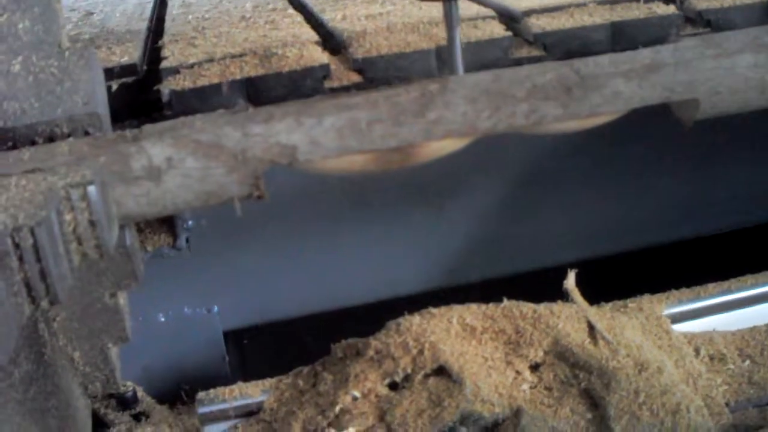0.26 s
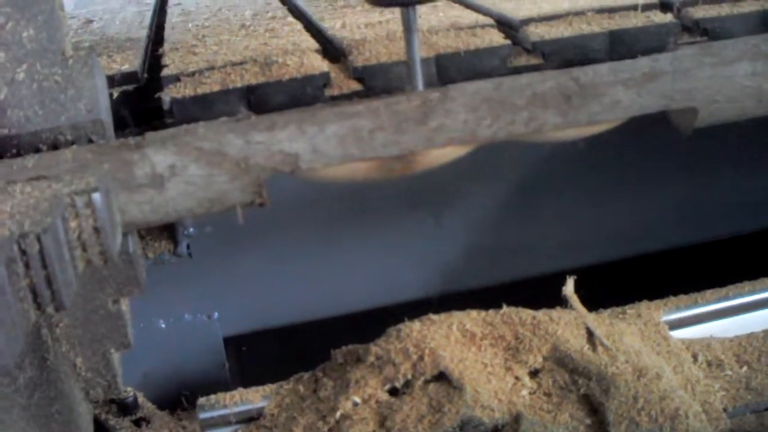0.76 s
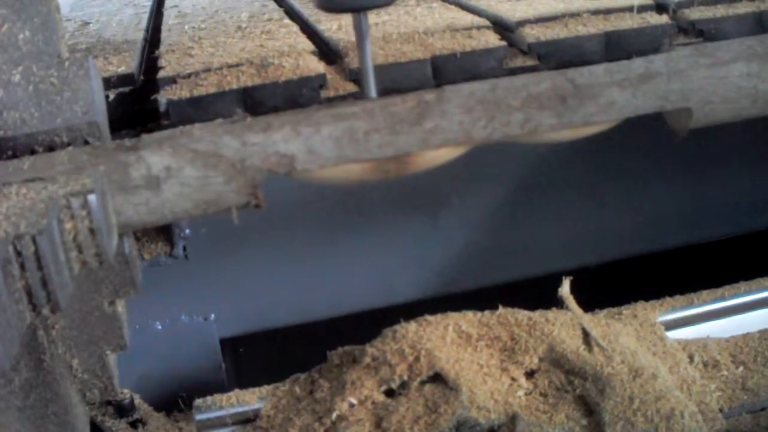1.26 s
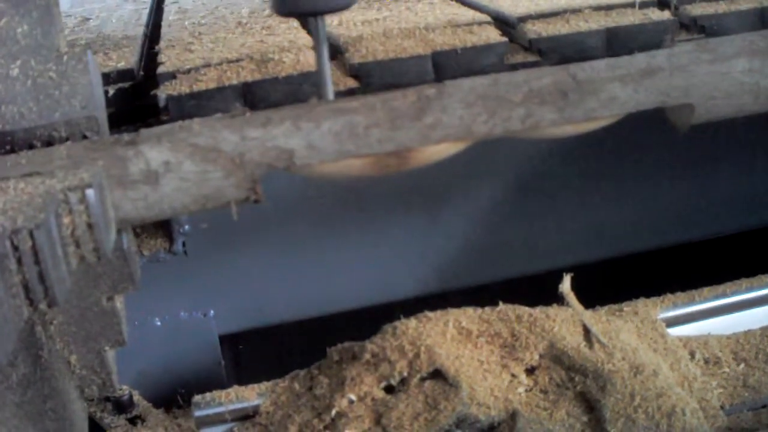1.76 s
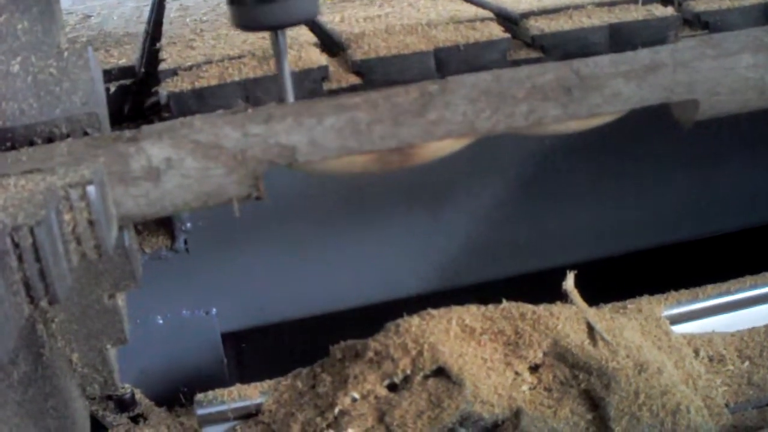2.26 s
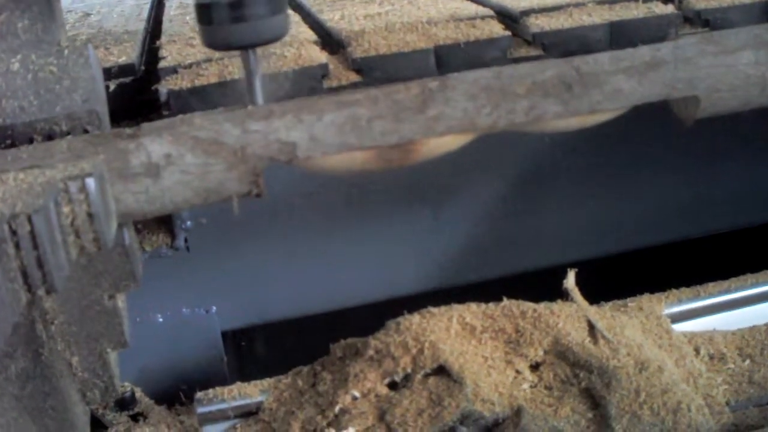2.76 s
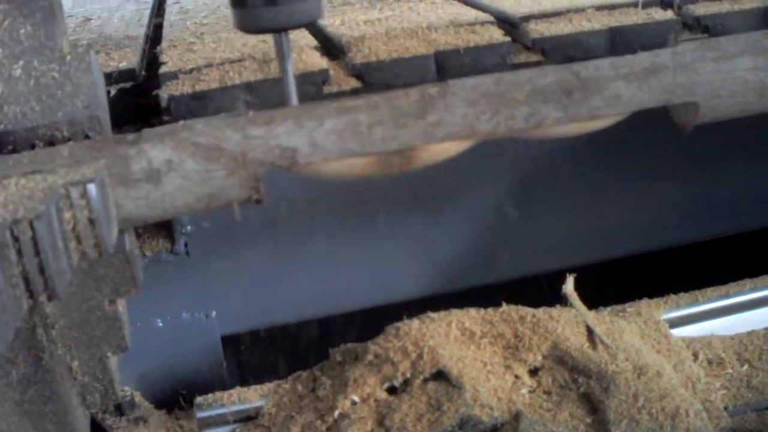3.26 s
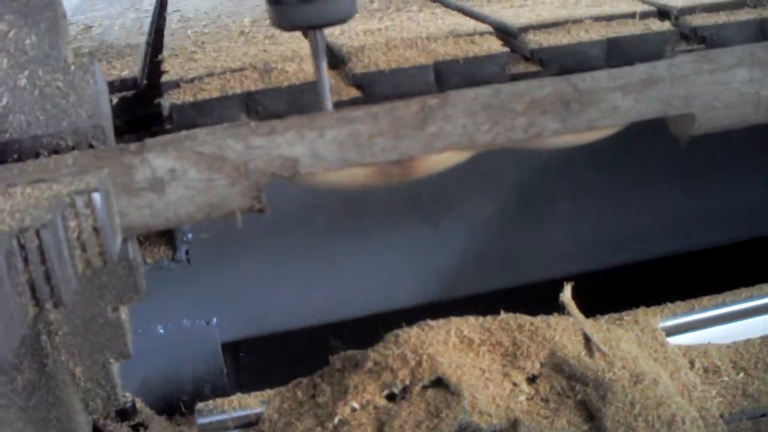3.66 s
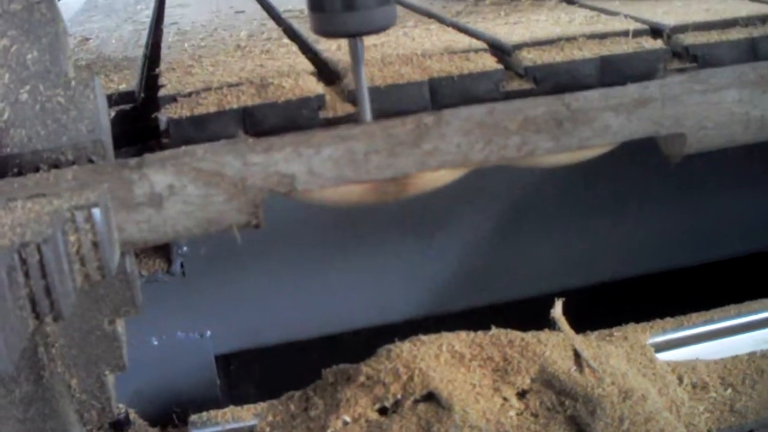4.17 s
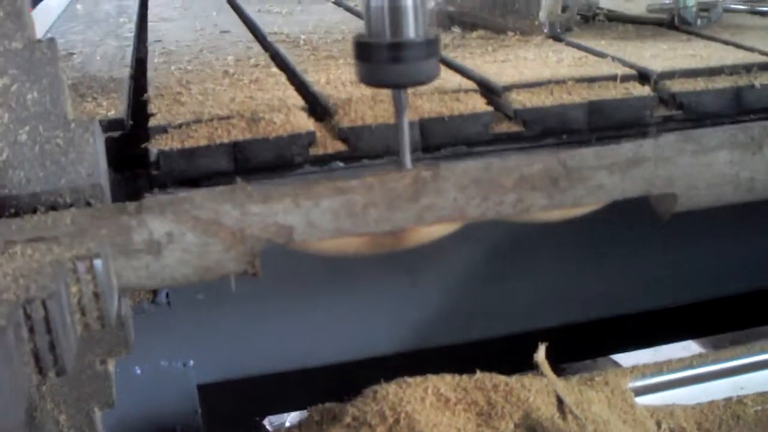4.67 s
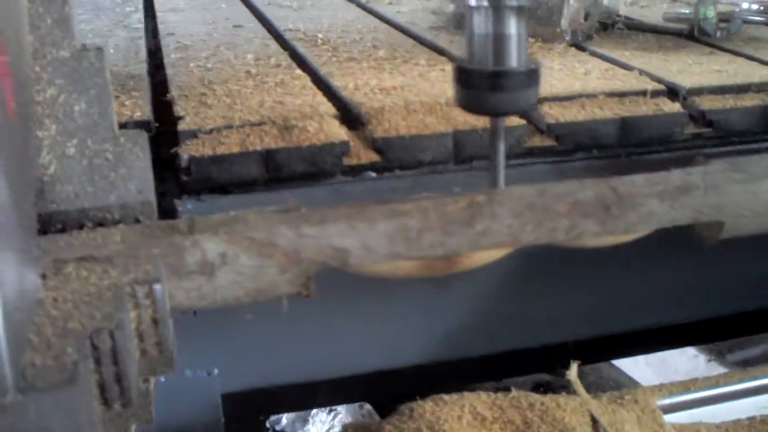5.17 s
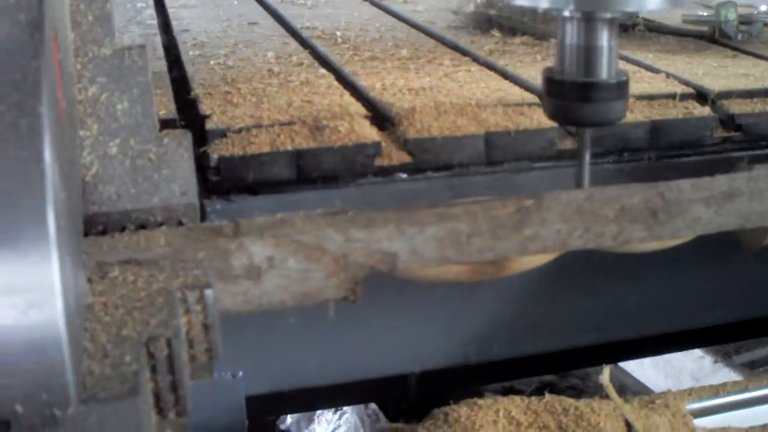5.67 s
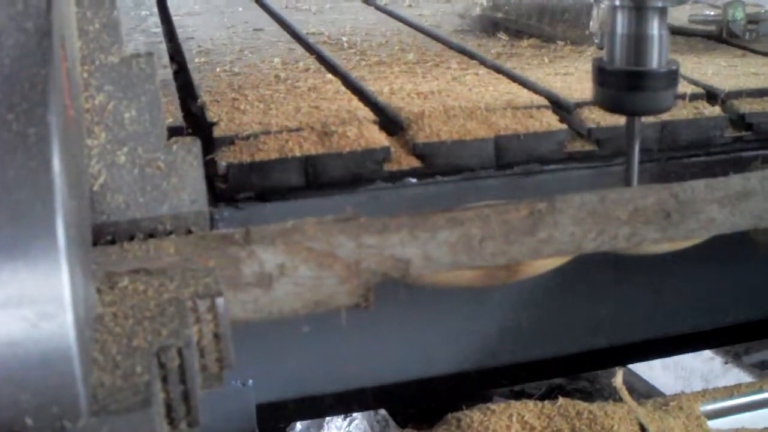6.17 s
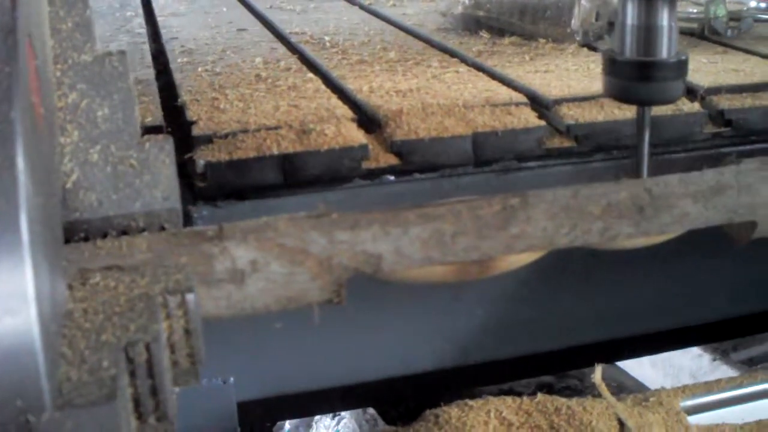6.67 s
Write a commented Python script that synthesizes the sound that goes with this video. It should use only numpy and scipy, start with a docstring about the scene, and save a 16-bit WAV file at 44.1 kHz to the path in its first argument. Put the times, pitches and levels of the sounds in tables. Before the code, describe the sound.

Close-up wood milling: buzzing high whine, gritty cutting hiss, piercing metallic squeals, a brief rough screech and a soft low rush.

```python
"""In a workshop, close to the microphone, a CNC router carves a wooden board.
The spindle whines at orders of 300 turns a second, and its two flutes rasp as noise pulsed twice a turn.
The slender bit rings in its bending modes, chatters near 4 kHz and once breaks into a screech.
A drive whistles thinly, axis motors hum louder in moves, a few dry ticks are decaying noise,
and a soft rush of low noise swells and fades."""
import sys
import numpy as np
from scipy import signal
from scipy.fft import rfft, irfft, next_fast_len
from scipy.io import wavfile
from scipy.ndimage import uniform_filter1d, minimum_filter1d

SR = 44100
rng = np.random.default_rng(int(sys.argv[2]) if len(sys.argv) > 2 else 0)


def wav_record(signal):
    """Record a signal, one row per channel, as 16-bit PCM in the file named by sys.argv[1]."""
    frames = np.transpose(np.atleast_2d(signal))
    bounded = np.clip(frames, -1, 1)
    # unit amplitude maps onto the largest positive 16-bit level
    quanta = np.round(bounded * 32767).astype(np.int16)
    wavfile.write(sys.argv[1], SR, quanta)


N = 305172
T = np.arange(N) / SR  # time in seconds


def amp(db):
    """Logarithmic level: converts decibels to an amplitude gain."""
    return 10 ** (np.asarray(db) / 20)


def unit(x):
    """Normalisation: scales a signal to an rms of 1."""
    return x / np.sqrt(np.mean(abs(x) ** 2) + 1e-20)


def curves(rows):
    """Linear interpolation: the columns of a timed table at every sample."""
    s, *columns = np.transpose(rows)
    return [np.interp(T, s, column) for column in columns]


def during(rows):
    """Gating: 1 while a timed table lasts, with soft edges."""
    since_start, until_end = T - rows[0][0], rows[-1][0] - T
    return np.clip(np.minimum(since_start, until_end) / 0.0035 + 1, 0, 1)


def bump(s, half_length_s):
    """Gaussian envelope: a smooth rise and fall around s."""
    return np.exp(-np.square((T - s) / half_length_s))


def swell(s, attack_s, release_s):
    """Attack and exponential relaxation: rises to 1 at s, then dies away."""
    return np.where(T < s, bump(s, attack_s), np.exp(-abs(T - s) / release_s))


def plateau(s, half_length_s):
    """Flat-topped envelope: rises quickly to 1, holds around s and falls again."""
    return 1 / (1 + ((T - s) / half_length_s) ** 8)


def wander(rate_hz):
    """Low-passed random motion: noise that weakens above rate_hz, at rms 1."""
    size = next_fast_len(N)
    hz = np.fft.rfftfreq(size, 1 / SR)
    spectrum = rfft(rng.standard_normal(size)) / (1 + (hz / rate_hz) ** 2)
    return unit(irfft(spectrum, size)[:N])


def coloured(x, points):
    """Linear filtering: weights the spectrum of x by (Hz, dB) points, at rms 1."""
    hz, db = np.transpose(points)
    log_hz = np.log(np.fft.rfftfreq(N, 1 / SR) + 1)
    gain = amp(np.interp(log_hz, np.log(hz), db))
    return unit(irfft(rfft(x) * gain, N))


def resonate(x, hz, width_hz):
    """Resonance: one damped mode, with gain 1 at its centre."""
    b, a = signal.iirpeak(hz, hz / width_hz, SR)
    return signal.lfilter(b, a, x)


# The shaft sags very slightly under load. Each row: time in seconds, mean speed in turns a second.
SHAFT_SPEED = [(0, 299.85), (.9, 299.75), (2.2, 299.85), (3.3, 299.9), (4.3, 299.7), (4.73, 299.45),
               (5.2, 299.55), (6, 299.9), (6.92, 299.8)]


def spindle_angle(flutter=0.00026):
    """Integration of speed: the angle of the shaft in radians, turning almost steadily."""
    turns_per_s = curves(SHAFT_SPEED)[0] * (1 + flutter * wander(38))
    return 2 * np.pi * np.cumsum(turns_per_s) / SR


# Depth of the cut, which rasp, hiss, rumble and the idle ring of the bit follow.
# Each row: time in seconds, relative level in dB.
CUT_DEPTH = [(0, 0.5), (.35, -2), (1.0, 0.5), (1.7, 0), (2.15, 3), (2.5, -1.5), (3.0, -1), (3.8, -3.5),
             (4.25, -7), (4.9, -4), (5.25, -2.5), (5.85, -2), (6.25, -3), (6.55, -3), (6.92, -1)]


def bite(dip_db, tear_db):
    """Additive decibels: depth, brief dips and tough grain together set the level of the cutting."""
    return curves(CUT_DEPTH)[0] + dip_db + tear_db


# Brief dips in the level of the cutting and whine, one under the rush of air.
# Each row: time of the lowest level in seconds, recovery time constant in seconds, change in dB.
LEVEL_DIPS = [(.266, .012, -7.5), (.335, 0.018, -5.5), (.776, .006, -5), (1.7, 0.034, -2.5),
              (2.254, 0.0091, -7), (2.699, 0.019, -14), (2.776, 0.085, -11), (3.958, 0.16, -8.5),
              (5.27, 0.02, -2.5), (6.22, 0.12, -2)]
DIP_ATTACK_S = .008


def dipping():
    """Exponential recovery: decibels lost in brief dips, which fall quickly and return gradually."""
    return sum(db * swell(s, DIP_ATTACK_S, recovery) for s, recovery, db in LEVEL_DIPS)


# Tough patches of grain that tear loudly.
# Each row: centre in seconds, half-length in seconds, gain in dB.
GRAIN_TEARS = [(0.454, 0.043, 2), (2.3, .02, 2.5), (2.94, 0.02, 3), (5.99, 0.039, 3.5), (6.383, 0.012, 2.5),
               (6.65, 0.021, 2.5), (6.77, 0.028, 4)]


def tearing():
    """Varying resistance: decibels gained in tough grain."""
    return sum(db * bump(s, half_length) for s, half_length, db in GRAIN_TEARS)


LOUD_SQUEAL = 0.22  # mean square that counts as a loud squeal


def squeal_loudness(squeal):
    """Saturation: how loud the squeal is, from 0 to about 1, by its running mean square."""
    return np.tanh(abs(uniform_filter1d(squeal ** 2, size=900)) / LOUD_SQUEAL)


FINISH_S, FINISH_RISE_S = 5.45, 0.24  # the resonance near 5 kHz wakes as the finishing pass begins


def finishing():
    """Linear onset: rises from 0 to 1 as the finishing pass begins."""
    return np.clip((T - FINISH_S) / FINISH_RISE_S, 0, 1)


# Path through four kinds of cut: 0 deep, 1 climbing out, 2 skimming, 3 finishing.
# Each row: time in seconds, kind of cut (fractions blend two kinds).
CUT_PATH = [(0, 0), (2.2, 0), (2.9, 1), (3.7, 1), (4.3, 2), (5.3, 2), (6.2, 3), (6.92, 3)]
# Timbre of the whine. Each row: multiple of the shaft rate, then relative level in dB
# in the deep, climbing, skimming and finishing cuts.
ORDER_LEVELS = [(1, -42.5, -46.5, -46.5, -39.5), (3, -43, -34.5, -34, -26.5), (4, -39.5, -32, -32.5, -36),
                (5, -62, -46, -52.5, -27), (7, -43, -45, -35.5, -30.5), (8, -40.5, -43, -38.5, -30),
                (9, -41, -45, -41.5, -30), (10, -36.5, -35, -34.5, -33), (11, -35.5, -61, -45, -30),
                (12, -29.5, -31, -30, -32), (14, -31, -26.5, -33.5, -30), (15, -39.5, -39, -57, -35),
                (16, -36, -52, -38.5, -38), (17, -36.5, -40, -33.5, -26), (18, -38, -41, -37, -44),
                (19, -30, -33.5, -32, -22.5), (20, -37, -37, -42, -28), (21, -27, -33, -33.5, -39),
                (22, -36, -36.5, -39, -37), (23, -38, -44, -32.5, -33), (24, -29.5, -40.5, -44, -41),
                (25, -44, -36, -37, -36.5), (26, -46, -30, -44, -41), (27, -43, -46, -48, -46),
                (28, -45, -40, -55, -49), (29, -43, -40, -45, -46), (30, -44, -45, -49, -45),
                (31, -40, -50, -48, -42), (32, -47, -47, -46, -52)]
# How hard each kind of cut drives the whine. Each row: gain in dB on the board's low orders,
# gain in dB on the bit's high orders.
CUT_LOAD = [(2, 0.15), (1.5, 1.3), (1, -0.3), (-3, -0.7)]
# Groups of orders swell or fade as the bit travels along the board. Each row: centre in seconds,
# half-length in seconds, centre frequency in Hz, half-width in Hz, gain at the centre in dB.
ORDER_SURGES = [(1.108, 0.63, 300, 150, 4.5), (3.37, 0.086, 300, 150, 11.5), (6.75, 0.49, 300, 150, 5.5),
                (2.33, 0.18, 2450, 120, 10.5), (2.2, 0.35, 3300, 100, 5), (2.14, 0.086, 5400, 120, 14.5),
                (1.8, 0.44, 6100, 110, -10), (1.6, 0.64, 7500, 600, 3), (3.748, 0.062, 7400, 350, 10),
                (4.64, 0.31, 5400, 450, 5.5), (5, 0.15, 5700, 150, -3), (5.12, 0.3, 1060, 190, 10.5),
                (5.15, 0.14, 7400, 1100, -9), (5.83, 0.057, 2400, 550, 9.5), (6.152, 0.21, 2470, 810, -5.5),
                (6.33, 0.25, 1270, 370, 9), (6.326, 0.057, 5100, 450, 7), (6.56, 0.095, 2930, 990, 7.5),
                (6.72, 0.17, 4700, 710, 6), (7.1, 0.29, 7200, 200, 5)]
# The tone at the rate of the two flutes. Each row: time in seconds, level in dB before ducking.
FLUTE_LEVEL = [(0, -32), (1.0, -35), (1.35, -47.5), (2.05, -32.5), (2.7, -40.5), (3.0, -19.5), (3.3, -23.5),
               (3.55, -26.5), (4.15, -29.5), (4.6, -22.5), (5.1, -20.5), (5.7, -23), (6.2, -18.5),
               (6.92, -21)]
# The sixth order, on a resonance of the board. Each row: time in seconds, level in dB before ducking.
BOARD_LEVEL = [(0, -29.5), (.42, -24), (.56, -34), (.68, -23), (1.6, -19), (2.0, -28.5), (2.8, -32),
               (3.05, -20.5), (3.25, -25.5), (3.68, -12), (4.05, -23.5), (4.3, -15.5), (5.0, -16),
               (5.32, -25), (5.83, -17.5), (5.95, -26.5), (6.92, -31.5)]
# The thirteenth order, on the bit's first bending mode.
# Each row: time in seconds, level in dB before ducking.
BIT_LEVEL = [(0, -19), (.45, -16.5), (.56, -23.5), (.82, -13), (1.5, -20.5), (1.68, -15.5), (1.76, -25),
             (1.95, -14.5), (2.9, -43), (3.7, -27), (4.0, -41), (4.3, -20.5), (4.7, -23), (5.3, -38),
             (6.0, -29), (6.92, -41)]


def whine(angle, loudness, low_duck_db=-10, high_duck_db=-4, flute_duck_db=-8, board_duck_db=-20,
          shimmer=0.23, slip=0.16):
    """Harmonic series: shaft orders flicker in uneven wood and dip in level while a squeal is loud."""
    cut, = curves(CUT_PATH)
    levels = {2: curves(FLUTE_LEVEL)[0] + flute_duck_db * loudness,
              6: curves(BOARD_LEVEL)[0] + board_duck_db * loudness,
              13: curves(BIT_LEVEL)[0] + high_duck_db * loudness}
    low_db, high_db = (np.interp(cut, range(len(CUT_LOAD)), db) for db in np.transpose(CUT_LOAD))
    board_db = low_db + low_duck_db * loudness
    bit_db = high_db + high_duck_db * loudness
    surges = np.array([db * plateau(s, half_length) for s, half_length, _, _, db in ORDER_SURGES])
    _, _, surge_hz, surge_width_hz, _ = np.transpose(ORDER_SURGES)
    for k, *kinds in ORDER_LEVELS:
        order_hz = k * SHAFT_SPEED[0][1]
        surge_db = np.exp(-((order_hz - surge_hz) / surge_width_hz) ** 2) @ surges
        load_db = board_db if k < 11.5 else bit_db
        levels[k] = np.interp(cut, range(len(kinds)), kinds) + surge_db + load_db
    grain, out = wander(9.3), np.zeros(N)
    for k, db in levels.items():
        # each order takes its own two stretches of the same random motion
        flicker, lag = (np.roll(grain, n) for n in rng.integers(0, N, 2))
        rough = np.sqrt(k / 10)  # high orders flicker more
        phase = k * angle + slip * rough * lag + 2 * np.pi * rng.random()
        out += amp(db) * (1 + shimmer * rough * flicker) * np.cos(phase)
    return np.sqrt(2) * out


# Thin whistle of the spindle's drive. Each row: frequency in Hz, relative level in dB.
SWITCHING_TONES = [(9292, -52), (9345, -32), (9889, -5), (10191, -3), (10788, -25), (11859, -22.5),
                   (12161, -34)]
# Level of that whistle. Each row: time in seconds, level in dB before ducking.
DRIVE_LEVEL = [(0, -40), (.3, -32), (.46, -28), (1.9, -29), (2.6, -38), (4.6, -34.5), (5.7, -51),
               (6.1, -45), (6.92, -37)]


def drive(loudness, duck_db=-5):
    """Electromagnetic excitation: thin switching tones of the motor, turned down while a squeal is loud."""
    tones = sum(amp(db) * np.cos(2 * np.pi * hz * T + .2 * wander(8.7)) for hz, db in SWITCHING_TONES)
    return np.sqrt(2) * amp(curves(DRIVE_LEVEL)[0] + duck_db * loudness) * tones


def bites(angle, depth=0.55, uneven=0.087, flicker_db=1.7, grit_db=1.5):
    """Amplitude modulation: noise torn off in two unequal bites a turn, in grains of random size."""
    pulse = np.exp(depth * np.cos(2 * angle) + uneven * np.cos(angle))
    grain_db = flicker_db * wander(20) + grit_db * wander(1800)
    return unit(rng.standard_normal(N) * pulse * amp(grain_db))


# Tearing wood fibres. Each row: frequency in Hz, relative spectral level in dB.
FIBRE_COLOUR = [(150, -9.5), (280, -7), (400, -5), (560, -0.5), (760, 5.5), (1050, -1), (1700, 3.5),
                (2500, -0.5), (3300, 2.5), (4300, 5), (6000, 1), (7200, -1), (9000, -15.5), (16000, -68)]
# High hiss of the cutting. Each row: frequency in Hz, relative spectral level in dB.
HISS_COLOUR = [(4000, -20), (7000, -8.5), (8500, 8.5), (10000, 8), (11000, 1), (12000, -13.5), (12800, -51),
               (16000, -36)]
# Low rumble. Each row: frequency in Hz, relative spectral level in dB.
LOW_COLOUR = [(15, -1), (60, -1), (150, -0.5), (300, -1), (700, -9.5), (3000, -59)]


def cutting(angle, loudness, bite_db, tear_db, rasp_db=-23, hiss_db=-32, rumble_db=-45, rasp_duck_db=0.0,
            rasp_finish_db=-1.0, hiss_squeal_db=6, rumble_squeal_db=8, hiss_tear=.5, hiss_share=0.85,
            rumble_share=0.45):
    """Broadband noise: rasp, hiss and low rumble follow the bite; hiss and rumble rise with loud squeals."""
    rasp_level = rasp_db + bite_db + rasp_duck_db * loudness + rasp_finish_db * finishing()
    rasp = amp(rasp_level) * coloured(bites(angle), FIBRE_COLOUR)
    hiss_level = hiss_db + hiss_share * bite_db + hiss_squeal_db * loudness + hiss_tear * tear_db
    hiss = amp(hiss_level) * coloured(bites(angle), HISS_COLOUR)
    rumble_level = rumble_db + rumble_share * bite_db + rumble_squeal_db * np.sqrt(loudness)
    rumble = amp(rumble_level) * coloured(rng.standard_normal(N), LOW_COLOUR)
    return rasp + hiss + rumble


# First bending mode during the deep cut. Each row: time in seconds, relative level in dB.
FIRST_MODE = [(0, -24), (.26, -24), (.33, -27), (.55, -23), (.62, -15.5), (1.45, -21), (1.6, -13.5),
              (1.73, -25), (2.0, -14.5), (2.25, -11.5)]
# Second bending mode. Each row: time in seconds, relative level in dB.
SECOND_MODE = [(0, -19), (.85, -33.5), (1.35, -25.5), (2.3, -19), (2.55, -29.5), (2.95, -25), (3.39, -19.5),
               (4.55, -38), (5.05, -26.5), (5.6, -23), (6.0, -23), (6.45, -37), (6.8, -25), (6.92, -28)]


def bit_ring(angle, bite_db, dip_db, tear_db, first_db=-6, second_db=-1, third_db=-31, idle_db=-28.5,
             third_tear=2.9):
    """Forced resonance: the noisy bites ring the resonances of the bit, each shaped by two peaks."""
    first = unit(resonate(resonate(bites(angle), 3894, 61), 3969, 91))
    second = unit(resonate(resonate(bites(angle), 7620, 510), 7690, 630))
    third = unit(resonate(resonate(bites(angle), 4960, 280), 4900, 370))
    rings = amp(curves(FIRST_MODE)[0] + first_db) * during(FIRST_MODE) * first
    rings += amp(curves(SECOND_MODE)[0] + second_db) * second
    rings += amp(third_db + third_tear * tear_db) * finishing() * third
    idle = amp(bite_db + idle_db) * first
    return amp(dip_db) * rings + idle


def bending(hz, waver):
    """Self-excited oscillation: phase of the bit's sideways vibration, slightly unsteady."""
    return 2 * np.pi * np.cumsum(hz) / SR + waver * wander(60)


# Tones beside the chatter from the passing flutes.
# Each row: multiple of the pitch, offset in shaft rates, relative level in dB.
FLUTE_SIDEBANDS = [(1, -2, -2), (1, -1, -1), (1, 1, -7), (1, 2, 0), (1, 3, -7), (1, 4, -13)]
# Tones from rubbing on the groove wall.
# Each row: multiple of the pitch, offset in shaft rates, relative level in dB.
WALL_RUBBING = [(2, -2, 0), (2, -1, -4), (2, 0, -8), (2, 1, -12), (1, 12, -6), (1, 13, -12)]


def companions(phase, angle, rows, flicker=0.33):
    """Intermodulation: sum and difference tones of vibration and shaft, each unsteady."""
    grain, out = wander(18), np.zeros(N)
    for m, k, db in rows:
        unsteady = 1 + flicker * np.roll(grain, rng.integers(N))
        tone_phase = round(m) * phase + round(k) * angle + 2 * np.pi * rng.random()
        out += amp(db) * unsteady * np.cos(tone_phase)
    return unit(out)


# Short squeals as the bit grabs the grain.
# Each row: centre in seconds, length in seconds, relative level in dB.
GRAIN_GRABS = [(0.027, 0.046, -8.5), (0.151, 0.032, -4.5), (0.219, 0.084, -8), (0.295, 0.029, -8),
               (0.365, 0.024, -8), (0.458, 0.11, -11), (.605, 0.038, -9.5), (0.808, 0.048, -16),
               (1.365, 0.023, -13.5), (1.603, 0.022, -12.5), (1.956, 0.052, -14), (2.085, 0.064, -14),
               (2.194, 0.018, -14), (2.237, 0.042, -9), (2.295, 0.044, -10)]


def grabs(angle, hz=3978, level_db=-2, side_db=-18, rub_db=-18):
    """Intermittent self-excitation: brief bursts of chatter in the deep cut."""
    envelope = sum(amp(db) * np.exp(-(2 * (T - s) / length) ** 4) for s, length, db in GRAIN_GRABS)
    phase = bending(hz + 12 * wander(12.3), 0.18)
    tones = unit(np.cos(phase) * (1 + 0.18 * wander(70)))
    tones += amp(side_db) * companions(phase, angle, FLUTE_SIDEBANDS)
    tones += amp(rub_db) * companions(phase, angle, WALL_RUBBING)
    return amp(level_db) * envelope * tones


def fizz(bit, level_db=-17):
    """Nonlinear noise: a wide hiss whose amplitude follows the mean square of the bit's sound."""
    power = abs(uniform_filter1d(bit ** 2, size=130))
    hiss = coloured(rng.standard_normal(N), [(100, 7), (8000, -2), (16000, -10)])
    return amp(level_db) * power * hiss


# Moves of the axis motors.
# Each row: time at full swell in seconds, run-down time constant in seconds, added level in dB.
MOTOR_MOVES = [(.52, 0.28, -35.5), (1.84, 0.15, -26.5), (3.01, 0.18, -33.5), (3.64, .12, -29.5),
               (4.92, 0.084, -25), (5.19, 0.1, -31), (6.032, 0.052, -30)]
AXIS_RUN_UP_S = 0.053


def axis_motors(hz=1330, idle_db=-44, half_db=-7):
    """Frequency modulation: a wavering motor tone and a weaker octave below swell with each move."""
    phase = 2 * np.pi * np.cumsum(hz + 12 * wander(4.88) + 22 * wander(81)) / SR
    moves = sum(amp(db) * swell(s, AXIS_RUN_UP_S, run_down) for s, run_down, db in MOTOR_MOVES)
    return (amp(idle_db) + moves) * unit(np.cos(phase) + amp(half_db) * np.cos(phase / 2))


# Dry ticks, the first at the sharp onset of a grab.
# Each row: time in seconds, level at the onset in dB.
TICK_ONSETS = [(0.287, -19), (2.495, -18), (2.588, -13), (5.991, -30), (6.67, -27), (6.77, -24)]


def ticks(decay_s=0.00092):
    """Exponential decay: dry, bright ticks of band noise that start at once and die away."""
    envelope = sum(amp(db) * (T >= s) * np.exp(-abs(T - s) / decay_s) for s, db in TICK_ONSETS)
    return envelope * unit(resonate(rng.standard_normal(N), 5500, 5400))


# Sustained chatter, one table a squeal. Each row: time in seconds, pitch in Hz, level in dB.
CHATTER_SQUEALS = [
    [(2.29, 3975, -37), (2.33, 3993, -6.5), (2.37, 3990, -13.5), (2.41, 3987, -9), (2.555, 3994, -7.5),
     (2.58, 3955, -16.5), (2.61, 4005, -8), (2.64, 4000, -9.5), (2.655, 4130, -14)],
    [(2.85, 4200, -28), (3.05, 4087, -28), (3.17, 4059, -17), (3.24, 4048, -26), (3.3, 4028, -9),
     (3.44, 4002, -10.5), (3.53, 3985, -16), (3.8, 3998, -20.5), (3.9, 3960, -34)],
    [(4.7, 3940, -28), (4.82, 3995, -38), (5.07, 3995, -23.5), (5.27, 3998, -34), (5.41, 4035, -12),
     (5.52, 4043, -10.5), (5.64, 4037, -12.5), (5.74, 4025, -17.5), (5.9, 3950, -37)],
]
# Tones beside each squeal when it is at 0 dB.
# Each row: level of the sidebands in dB, level of the rubbing on the groove wall in dB.
SQUEAL_SIDES = [(-17, -26), (-20, -11.5), (-16, -4.5)]


def chatter(angle, waver=0.13, flutter=0.11, lock_db=-18, loose=0.86, sing_db=-25, side_growth=0.5,
            rub_growth=0.86):
    """Self-excited chatter: gliding squeals, ragged when weak; strong ones lock and rub the wall."""
    out = np.zeros(N)
    for rows, (side_db, rub_db) in zip(CHATTER_SQUEALS, SQUEAL_SIDES):
        hz, db = curves(rows)
        ragged = 1 + loose / (1 + amp(db - lock_db) ** 2)
        phase = bending(hz, waver * ragged)
        tones = amp(db) * unit(np.cos(phase))
        tones += amp(side_db + side_growth * db) * companions(phase, angle, FLUTE_SIDEBANDS)
        tones += amp(rub_db + rub_growth * db) * companions(phase, angle, WALL_RUBBING)
        # the third upper sideband falls on the 5 kHz resonance and sings out with it
        tones += amp(sing_db) * finishing() * unit(np.cos(phase + 3 * angle))
        out += during(rows) * tones * (1 + flutter * ragged * wander(25))
    return out


# The bit bounces in its groove. Each row: time in seconds, centre pitch in Hz, level in dB.
BOUNCE_PATH = [(2.63, 4310, -28), (2.648, 4370, -10.5), (2.675, 4485, -9), (2.692, 4440, -9.5),
               (2.698, 4380, -19), (2.722, 4395, -16), (2.742, 4430, -9.5), (2.76, 4405, -14.5),
               (2.772, 4390, -36)]
# What the bit radiates while it bounces. Each row: frequency in Hz, relative level in dB.
BOUNCE_COLOUR = [(2800, -15), (3450, 1.5), (4100, 0), (4750, 1), (5400, -3.5), (5900, -9), (7200, -11),
                 (8000, 3), (9000, 1.5), (10500, -4)]


def screech(angle, sweep=3.0, overtone_db=-6, bounce=0.17):
    """Phase modulation: the bit strikes the wall once a turn, and its pitch sweeps in step with the shaft."""
    hz, db = curves(BOUNCE_PATH)
    phase = 2 * np.pi * np.cumsum(hz) / SR + .36 * wander(150)
    phase_sweep = sweep * (np.sin(angle) - np.cos(2 * angle) / 4)
    tone = np.cos(phase + phase_sweep) + amp(overtone_db) * np.cos(2 * phase - angle + phase_sweep)
    bounced = tone * (1 + bounce * np.cos(angle + 1))
    return amp(db) * during(BOUNCE_PATH) * coloured(bounced, BOUNCE_COLOUR)


# Colour of the rush of air. Each row: frequency in Hz, relative spectral level in dB.
RUSH_COLOUR = [(90, -45), (170, -14), (260, 0), (390, -3.5), (550, 2), (900, 0.5), (1400, -4.5), (2200, -9),
               (4000, -13), (9000, -64)]
AIR_S, AIR_RISE_S, AIR_HOLD_S, AIR_FADE_DB_PER_S = 3.754, .13, 0.26, 32


def air(level_db=-21):
    """Filtered noise: a soft, low rush that swells quickly, holds and dies away."""
    t = T - AIR_S
    fade_db = AIR_FADE_DB_PER_S * np.maximum(t - AIR_RISE_S - AIR_HOLD_S, 0)
    rise = np.clip(t / AIR_RISE_S, 0, 1)
    return rise * amp(level_db - fade_db) * coloured(rng.standard_normal(N), RUSH_COLOUR)


def scene():
    """Superposition: all sources add, and the cutting sounds share one shaft angle and one bite."""
    angle, dip_db, tear_db = spindle_angle(), dipping(), tearing()
    bite_db = bite(dip_db, tear_db)
    squeal = grabs(angle) + chatter(angle) + screech(angle)
    loudness = squeal_loudness(squeal)
    bit = bit_ring(angle, bite_db, dip_db, tear_db) + squeal
    tones = amp(dip_db) * (whine(angle, loudness) + drive(loudness))
    wood = cutting(angle, loudness, bite_db, tear_db)
    mix = tones + wood + bit + fizz(bit) + axis_motors() + ticks() + air()
    return mix[None]  # one channel


EDGE_HZ = 15900  # upper band limit


def record(dry, ceiling=0.95):
    """Peak limiting and band limiting: a fast limiter holds the loudest peaks down before a low-pass."""
    gain = np.minimum(1, ceiling / (abs(dry) + 1e-9))
    gain = uniform_filter1d(minimum_filter1d(gain, size=90), size=70)
    low_pass = signal.firwin(511, EDGE_HZ, window=("kaiser", 9), fs=SR)
    return signal.oaconvolve(dry * gain, low_pass[None], "same")


dry = scene()
out = record(dry)
wav_record(out)
```